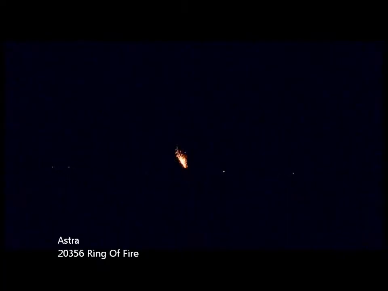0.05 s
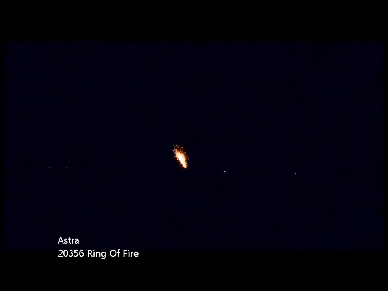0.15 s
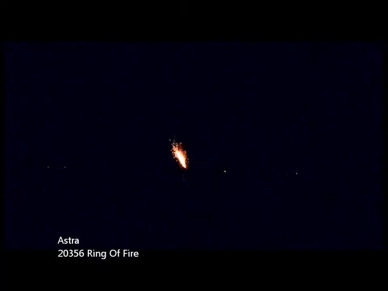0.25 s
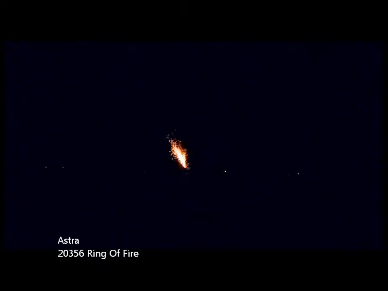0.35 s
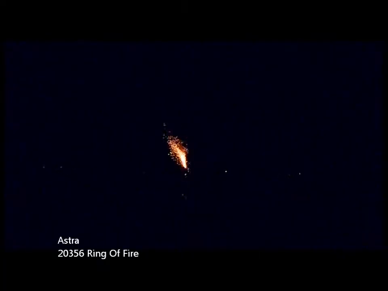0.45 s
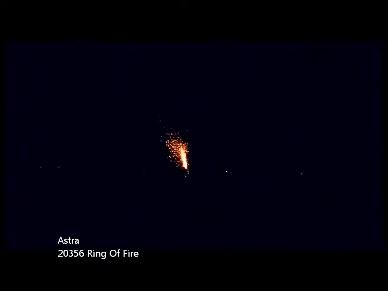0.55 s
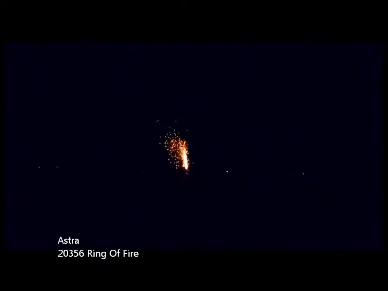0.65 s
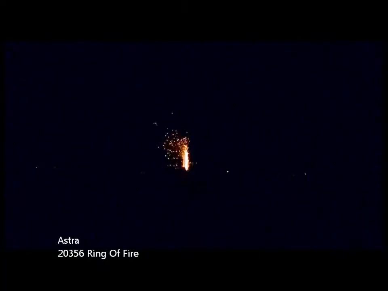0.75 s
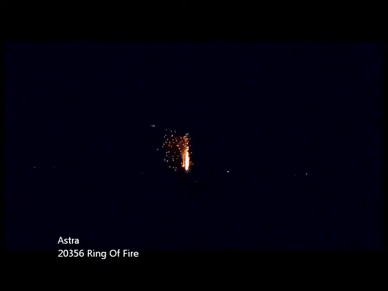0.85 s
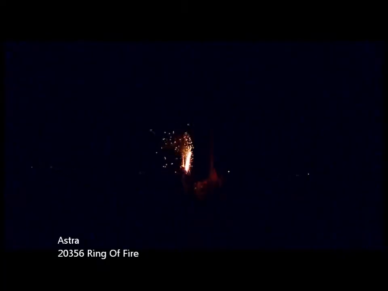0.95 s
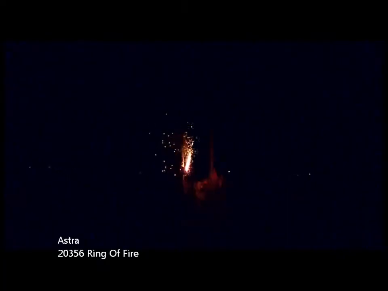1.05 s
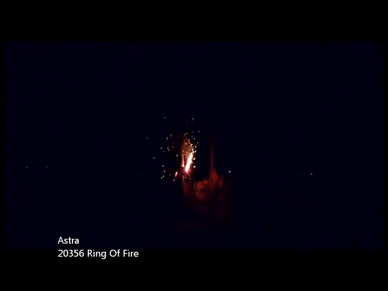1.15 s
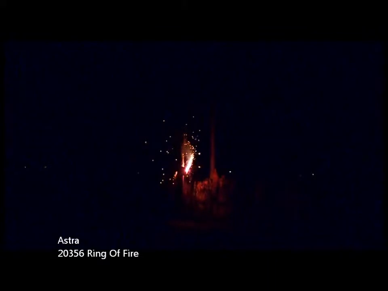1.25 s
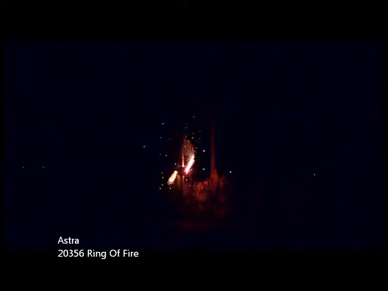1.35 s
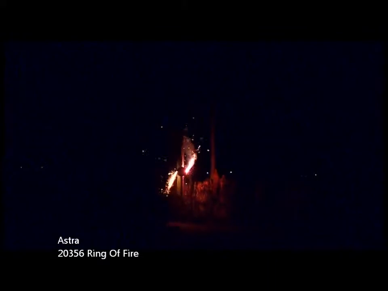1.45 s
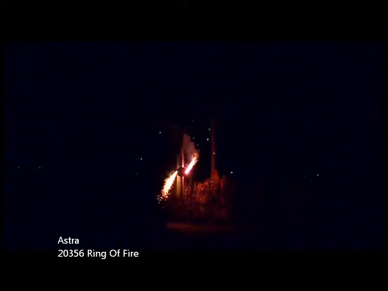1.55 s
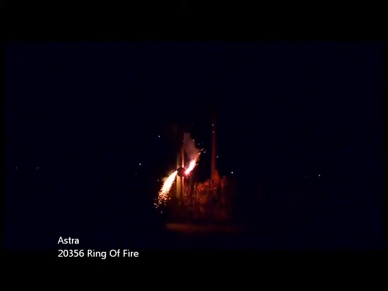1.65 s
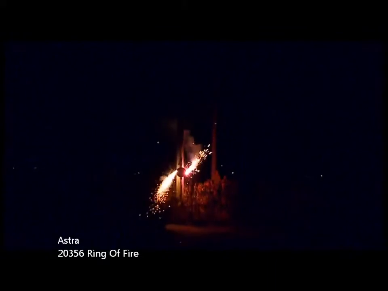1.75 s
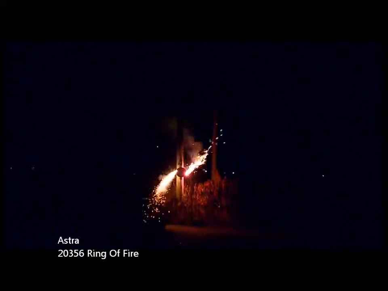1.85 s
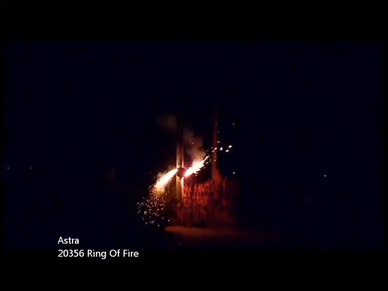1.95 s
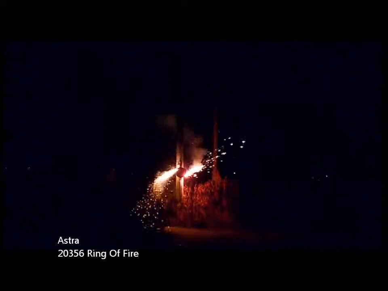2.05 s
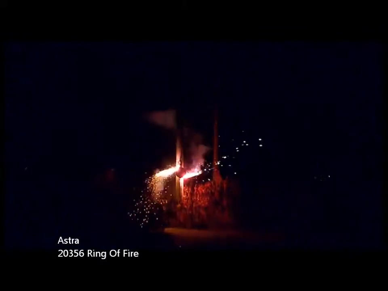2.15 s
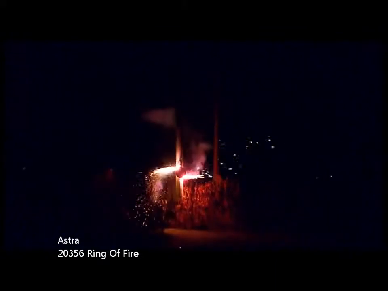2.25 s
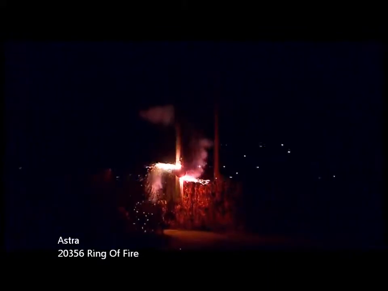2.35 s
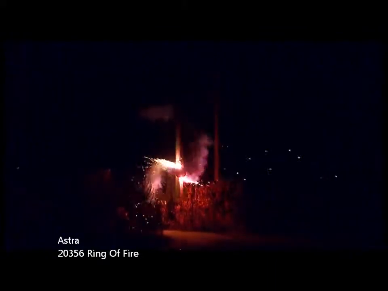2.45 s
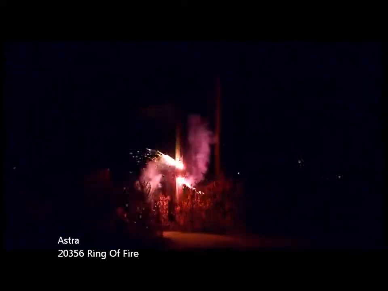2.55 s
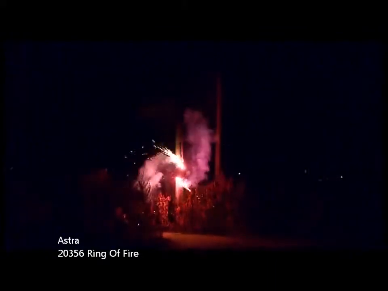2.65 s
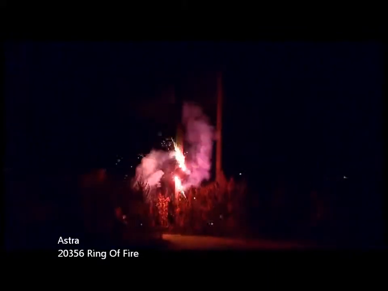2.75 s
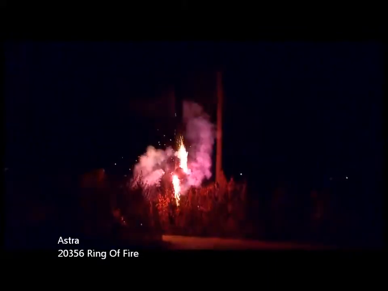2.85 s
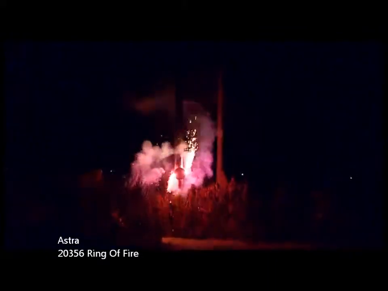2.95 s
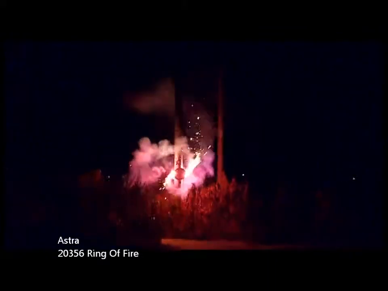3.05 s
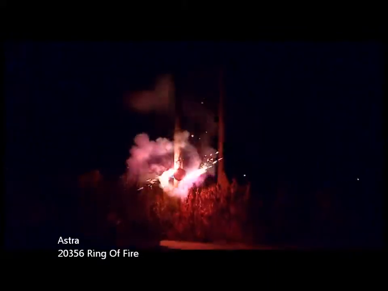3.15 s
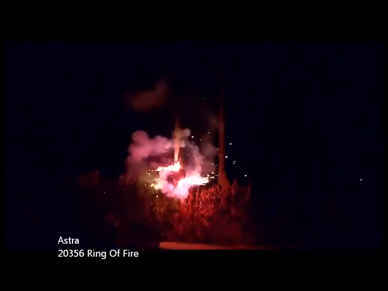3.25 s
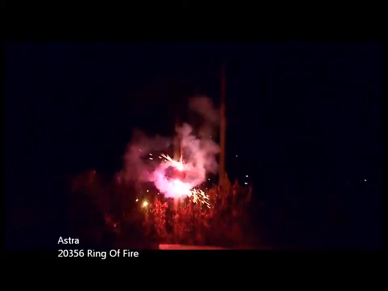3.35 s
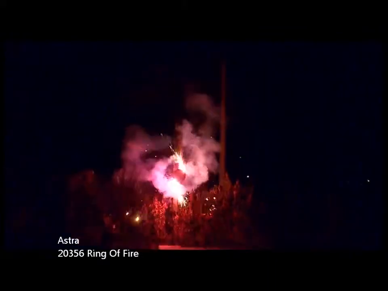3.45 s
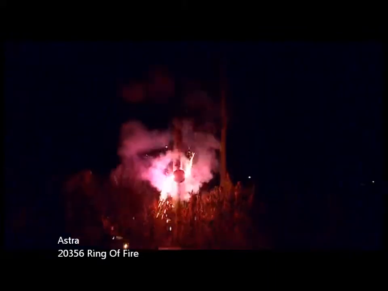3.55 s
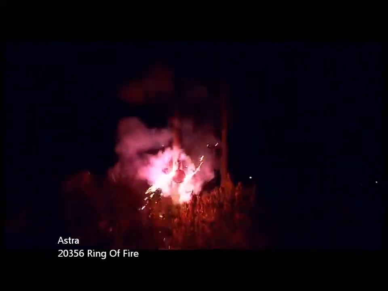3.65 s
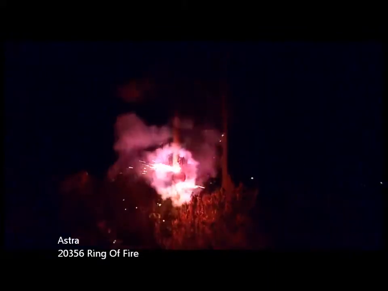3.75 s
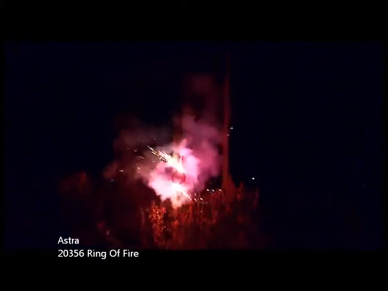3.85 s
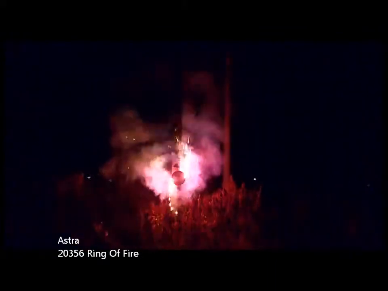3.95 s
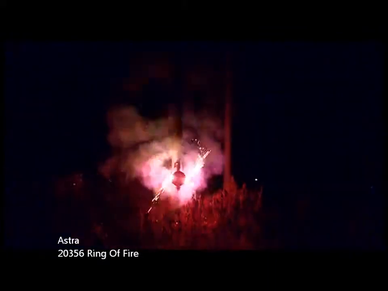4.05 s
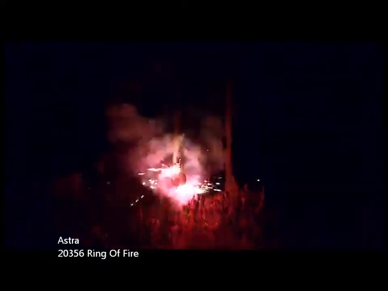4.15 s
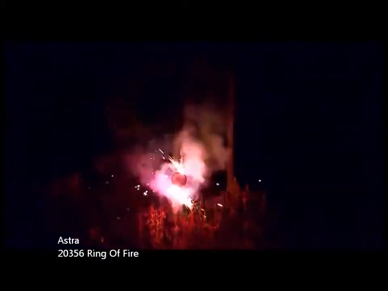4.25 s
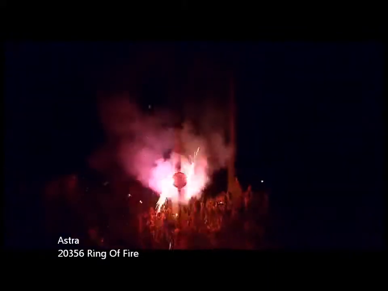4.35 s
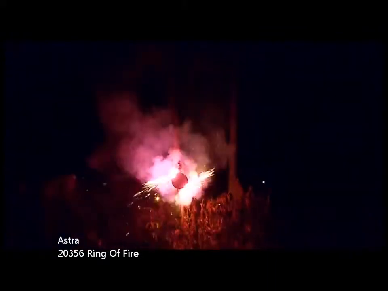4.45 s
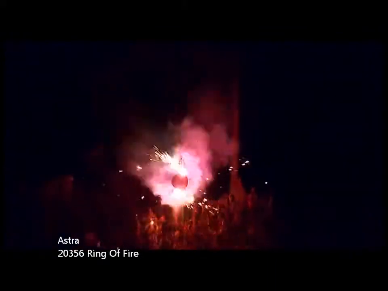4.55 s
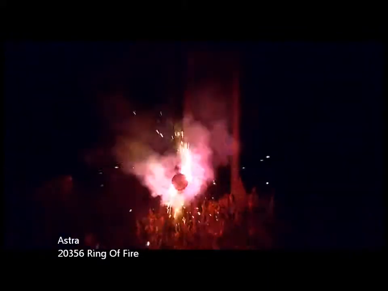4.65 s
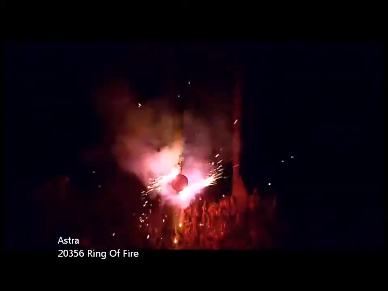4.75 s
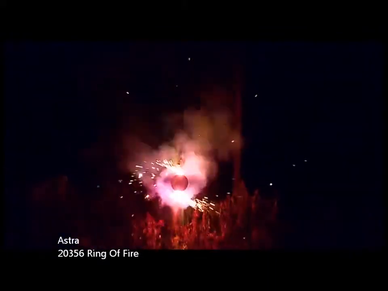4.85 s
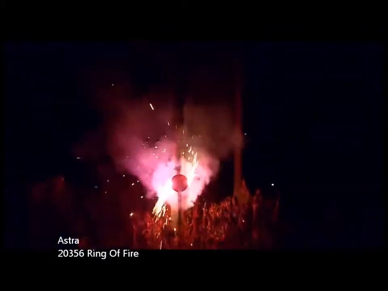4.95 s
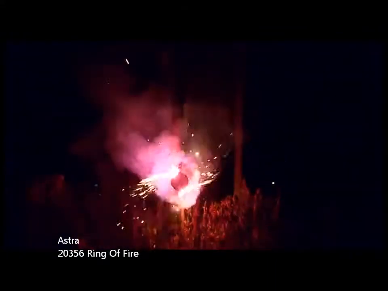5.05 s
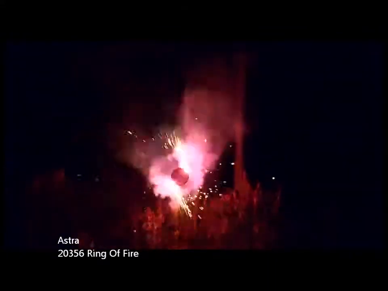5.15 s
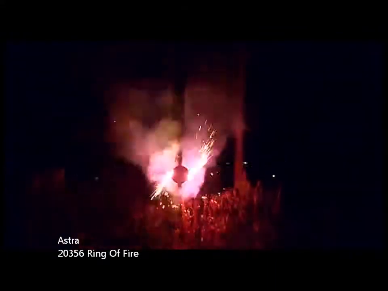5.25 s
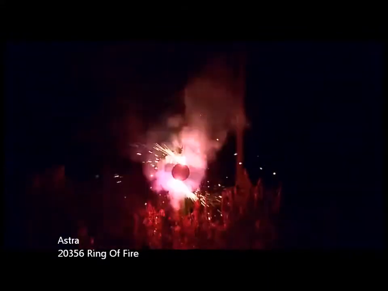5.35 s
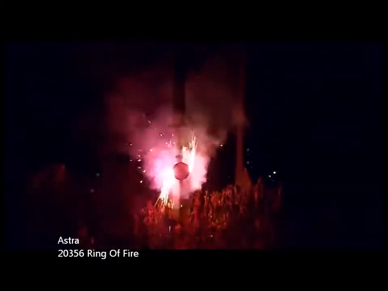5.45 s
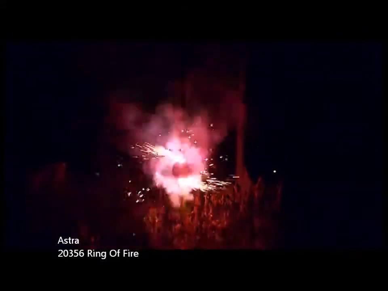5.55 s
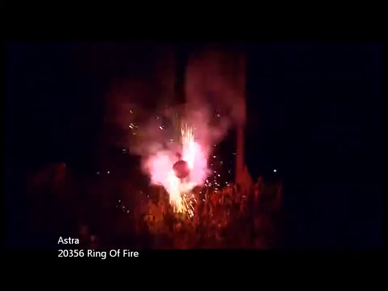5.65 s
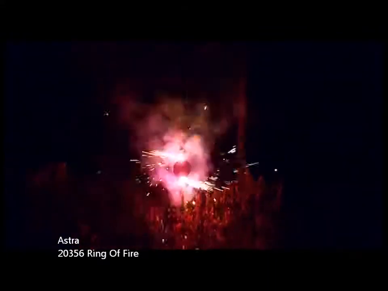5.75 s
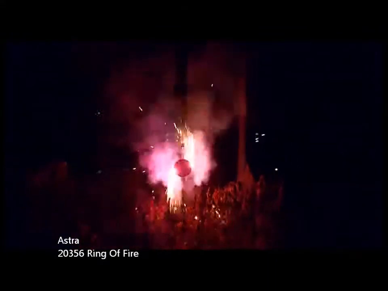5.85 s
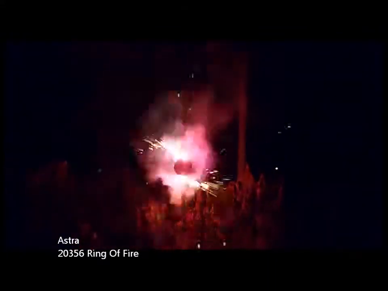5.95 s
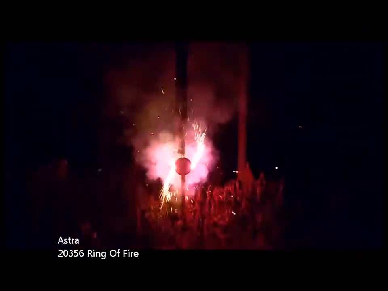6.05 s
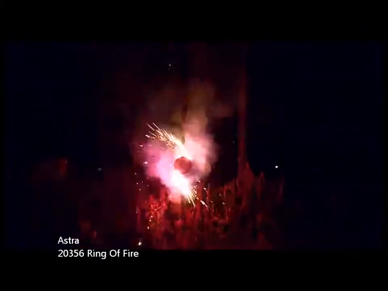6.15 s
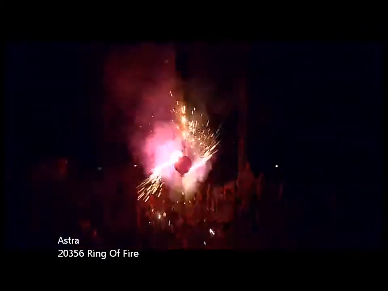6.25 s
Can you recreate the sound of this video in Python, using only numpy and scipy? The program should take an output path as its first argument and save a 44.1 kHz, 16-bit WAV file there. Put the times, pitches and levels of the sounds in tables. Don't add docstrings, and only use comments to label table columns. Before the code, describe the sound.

Over faint far traffic, a gunpowder jet swells from a tick and fizz to a harsh, sweeping, fluttering hiss that holds.

```python
import sys
import numpy as np
from scipy import signal
from scipy.fft import rfft, irfft
from scipy.io import wavfile
from scipy.ndimage import map_coordinates

SR = 44100
rng = np.random.default_rng(int(sys.argv[2]) if len(sys.argv) > 2 else 0)


def voltage_ratio(level):
    return 10 ** (np.asarray(level, float) / 20)


def dump_mix(stems):
    frames = np.atleast_2d(stems).T
    limited = np.clip(frames, -1, 1)
    pcm = np.round(limited * 32767).astype(np.int16)
    wavfile.write(sys.argv[1], SR, pcm)


N = 277830
TIME = np.arange(N) / SR
HZ = np.maximum(np.arange(N // 2 + 1) * SR / N, 1)


def rms_one(x):
    return x / np.sqrt(np.mean(x ** 2) + 1e-20)


def in_time(rows):
    s, *columns = np.transpose(rows)
    return [np.interp(TIME, s, column) for column in columns]


def in_pitch(points):
    hz, level_db = np.transpose(points)
    return np.interp(np.log(HZ), np.log(hz), level_db)


def coloured(x, shape_db):
    return irfft(rfft(x) * voltage_ratio(shape_db), N)


def cut(x, hz, kind, order=2):
    return signal.sosfilt(signal.butter(order, min(hz, .45 * SR), kind, fs=SR, output="sos"), x)


def drift(rate):
    pole = np.exp(-80 * np.pi * rate / SR)
    noise = rng.standard_normal(N // 40 + 2002)
    slow = signal.lfilter([1], [1, -2 * pole, pole * pole], noise)[2000:]
    return np.interp(np.arange(N) / 40, np.arange(len(slow)), rms_one(slow))


def bump(at, length):
    return np.exp(-.5 * ((TIME - at) / length) ** 2)


def jets():
    # t/s, angle/turns (.25 = second jet on top)
    spin = [(0, -.21), (1.6, -.02), (2.25, .12), (2.65, .25), (3.1, .5), (3.42, .75), (3.63, 1.0),
            (4.12, 1.5), (4.46, 2.0), (5.07, 3.0), (5.54, 4.0), (5.96, 5.0), (6.3, 6.03)]
    # t/s, level/dB
    second_level = [
        (0, -30),
        (1.05, -25),
        (1.6, -6),
        (1.9, 1.5),
        (2.2, 9),
        (2.9, 8),
        (3.3, 7),
        (4.5, 7.5),
        (5.5, 5.5),
        (6.3, 2.5),
    ]
    rising_db = 3
    wall_s, wall_db, wall_cut_hz = .0462, -8, 1100
    angle = 2 * np.pi * in_time(spin)[0]
    height = np.sin(angle)
    ratio = voltage_ratio(in_time(second_level)[0] + rising_db * np.cos(angle))
    total = np.sqrt(1 + ratio ** 2)
    first = burning(flicker_db=0.57) / total
    second = burning(flicker_db=0.53) * ratio / total
    both = voltage_ratio(-3.0) * (off_ground(first, -height) + off_ground(second, height))
    lag = round(wall_s * SR)
    both[:, lag:] += voltage_ratio(wall_db) * cut(both[:, :-lag], wall_cut_hz, "low", order=1)
    return both


def burning(flicker_db):
    # f/Hz, level/dB per Hz
    jet_spectrum = [(50, -45), (120, -13.5), (280, -13.5), (480, -9.5), (900, -9.5), (1400, -9),
                    (2500, -1.5), (3500, -7.5), (4300, -14), (5000, -17), (7100, -18), (8400, -15.5),
                    (12500, -17), (13300, -25)]
    tube_hz, tube_width_hz = 2600, 320
    roar_db, hiss_db, ring_db, sizzle_db = vigour()
    gas = rfft(rng.standard_normal((2, N))) * voltage_ratio(in_pitch(jet_spectrum))
    low = 1 / (1 + (HZ / 750) ** 4)
    high = 1 - 1 / (1 + (HZ / 3700) ** 6)
    middle = 1 - low - high
    tube = middle / (1 + (2 * (HZ - tube_hz) / tube_width_hz) ** 2)
    shares = (low, middle - tube, tube, high)
    roar, hiss, ring, sizzle = [rms_one(irfft(gas * share, N)) for share in shares]
    roar = roar * voltage_ratio(roar_db + 0.82 * drift(3.7))
    hiss = hiss * voltage_ratio(hiss_db - 0.16 + 0.42 * drift(7.7))
    ring = ring * voltage_ratio(ring_db + 1.7 * drift(25))
    sizzle = sizzle * voltage_ratio(sizzle_db + 0.23 + .5 * drift(37))
    flicker = voltage_ratio(flicker_db * (drift(12.7) + 0.76 * drift(40)))
    return flicker * (roar + hiss + ring + sizzle)


def vigour():
    # t/s, vigour/dB, brightness/dB
    burn = [(0.0, -60.5, 2.5), (0.25, -47, 0.5), (0.42, -40, 1.5), (0.7, -42.5, -1.5), (0.98, -42, 0.5),
            (1.1, -35.5, -4), (1.5, -35, -3.5), (1.9, -33, -0.5), (2.3, -34, 0.2), (2.6, -30, -2),
            (3.3, -30.5, -1), (4.2, -31, -0.5), (5.4, -31, 0.4), (6.3, -29.5, -0.6)]
    # t/s, hiss gain/dB, tube ring gain/dB, length/s
    flares = [(.42, 1.5, -3.5, .08), (.6, -1.5, 0.5, .08), (1.3, -2, 1.5, 0.19), (1.6, -1.5, 1.5, .12),
              (1.87, 0.5, 4, 0.02), (2.637, 2.5, 2, 0.05), (2.77, -1, 2.5, .05), (3.436, 4, 3, 0.026),
              (3.65, 1, 2, 0.045), (3.883, 3.5, 4.5, 0.041), (4.314, 2, 6, 0.03), (4.613, 2.5, 2, 0.036),
              (4.8, 1, 4, 0.019), (4.93, 0, 6, 0.028), (5.058, 2, 3, 0.03), (5.18, 2.5, 0, .025),
              (5.438, 2.5, 7, 0.028), (5.653, 4.5, 6, 0.0095), (5.86, .3, 5, 0.034), (6.05, 3.5, 0, 0.0083),
              (6.235, 1, 4.5, 0.027)]
    # t/s, gain/dB
    gulps = [
        (3.35, 5.5),
        (4.6, 2.5),
        (5.7, 6.5),
        (6.26, 2),
    ]
    gulp_s = 0.021
    burn_db, bright_db = in_time(burn)
    swing_db = burn_db + 31
    flare_db = sum(db * bump(s, length) for s, db, _, length in flares)
    ring_flare_db = sum(db * bump(s, length) for s, _, db, length in flares)
    ring_db = -34 + 1.25 * swing_db + ring_flare_db
    roar_db = -40.5 + 0.58 * swing_db + 0.37 * flare_db
    roar_db = roar_db + 5 * bump(2.08, 0.48)
    roar_db = roar_db + sum(db * bump(s, gulp_s) for s, db in gulps)
    return roar_db, burn_db + flare_db, ring_db, burn_db + bright_db


def off_ground(x, height):
    delay_ms = .667 + .084 * height
    read = np.arange(N) - delay_ms * SR / 1000
    echo = [map_coordinates(channel, [read], order=3, mode="nearest") for channel in x]
    echo_db = -3.5 - .55 * TIME
    return x + voltage_ratio(echo_db) * cut(echo, 8500, "low", order=1)


def chuffs():
    # t/s, peak level/dB, f/Hz, rise/s
    pops = [
        (0.2832, -29, 1200, 0.00036),
        (5.696, -29, 420, 0.002),
        (6.258, -26, 424, 0.0021),
    ]
    out, age = np.zeros(N), np.arange(1024) / SR
    for s, peak_db, hz, rise in pops:
        swell = age / rise * np.exp(1 - age / rise)
        puff = (np.sin(2 * np.pi * hz * age) + .3) * swell
        at = round(s * SR)
        out[at:at + 1024] += voltage_ratio(peak_db) * puff
    return out


def night():
    # f/Hz, level/dB per Hz
    far_spectrum = [(20, -1), (40, 9), (75, 4.5), (142, -3), (485, -17), (642, -15), (1660, -15),
                    (3840, -19), (6180, -46.5), (8410, -23), (16000, -31)]
    air = rms_one(coloured(rng.standard_normal((2, N)), in_pitch(far_spectrum)))
    air = air * voltage_ratio(-47 + 2.1 * drift(1.3))
    hum_hz = 65.8 + 2.79 * drift(3.24)
    near_db = 4.5 * bump(1.7, 0.65)
    hum_db = -52.5 + near_db + 1.2 * drift(1.3) + 1.0 * drift(15)
    return air + np.sin(2 * np.pi * np.cumsum(hum_hz) / SR) * voltage_ratio(hum_db)


def scene():
    # f/Hz, side minus mid level/dB
    width_spectrum = [(2600, -13), (3400, -6), (4500, 0.0), (5300, -1.5), (5900, -12), (6600, -21),
                      (7450, -4), (8500, -21), (9400, -3), (11500, -8), (12700, -15), (13600, 0.0),
                      (14800, -3), (15300, -10)]
    mid, side = jets() + night()
    mid, side = mid + chuffs(), coloured(side, in_pitch(width_spectrum))
    return np.array([mid + side, mid - side])


def top_cut(x):
    return signal.sosfilt(signal.butter(12, 16900, fs=SR, output="sos"), x)


def record(dry):
    # f/Hz, width/Hz, level/dB
    housing = [(1190, 160, 3), (1639, 154, 7.5), (2020, 120, 6.5), (2497, 200, 3.5), (3487, 180, 7.5),
               (5730, 260, 4), (6620, 250, 4), (15500, 500, 2.5), (467, 93, 6.5), (3880, 174, 5),
               (5190, 83, -4.5), (7530, 970, -2.5), (8440, 390, 2.5), (9430, 220, -8), (10080, 230, -6.5),
               (10750, 300, 0), (12060, 320, -6.5), (13600, 250, 1), (14050, 350, -7), (14900, 400, 0),
               (15250, 200, -2.5)]
    # f/Hz, left minus right level/dB
    tilt = [(700, 1.5), (3000, -2), (3700, -1), (4400, 5), (4800, 5), (5250, -4.5), (5800, -3.5),
            (8900, 0.5), (9400, -6.5), (10500, 12.5), (11500, -0.5), (13700, -2.5), (14500, -3), (15200, 6)]
    housing_db = sum(db / (1 + (2 * (HZ - hz) / width) ** 2) for hz, width, db in housing)
    housing_db = housing_db - 60 * (HZ > 15740)
    left, right = coloured(dry, housing_db + in_pitch(tilt) * [[.5], [-.5]])
    right = cut(right, 250, "high")
    return top_cut(np.array([left, right]))


dry = scene()
out = record(dry)
dump_mix(out)
```